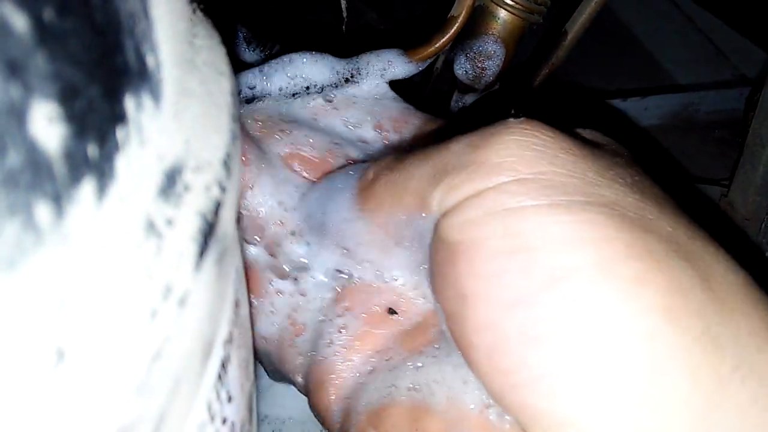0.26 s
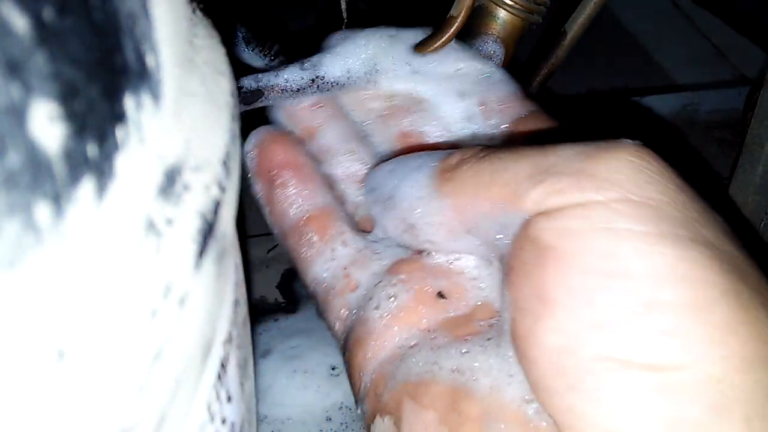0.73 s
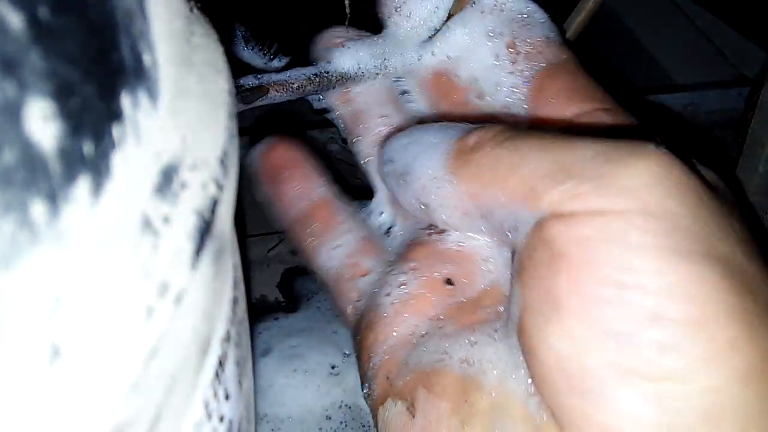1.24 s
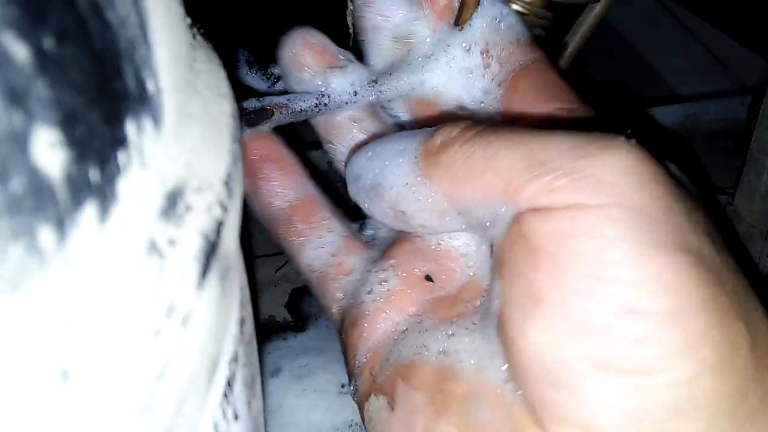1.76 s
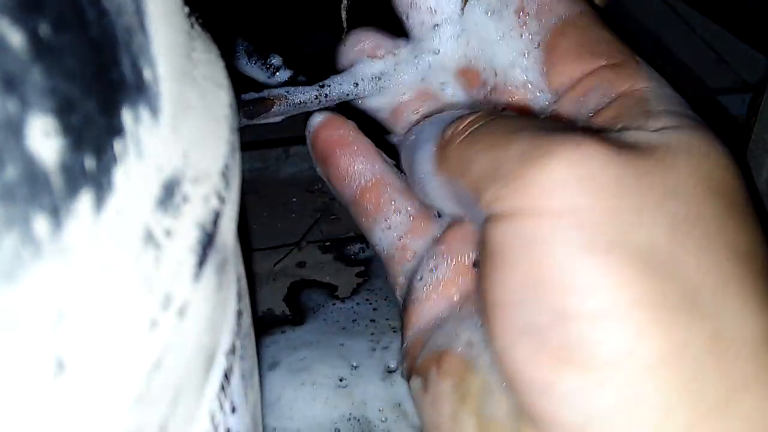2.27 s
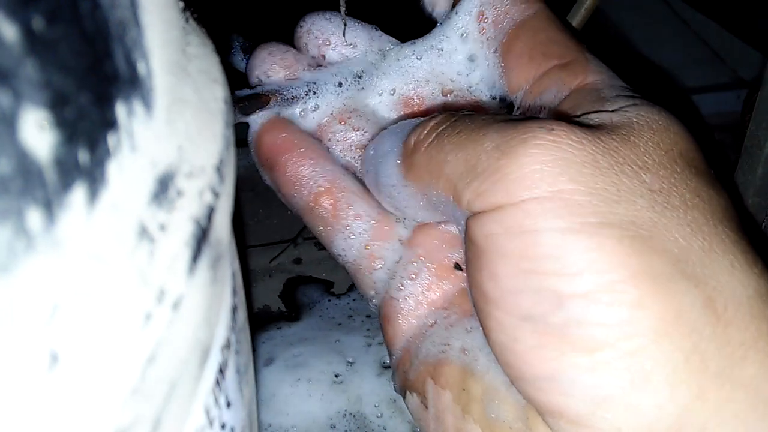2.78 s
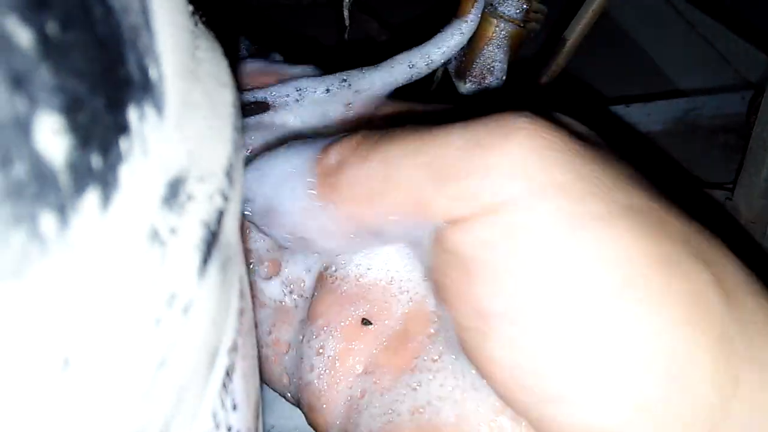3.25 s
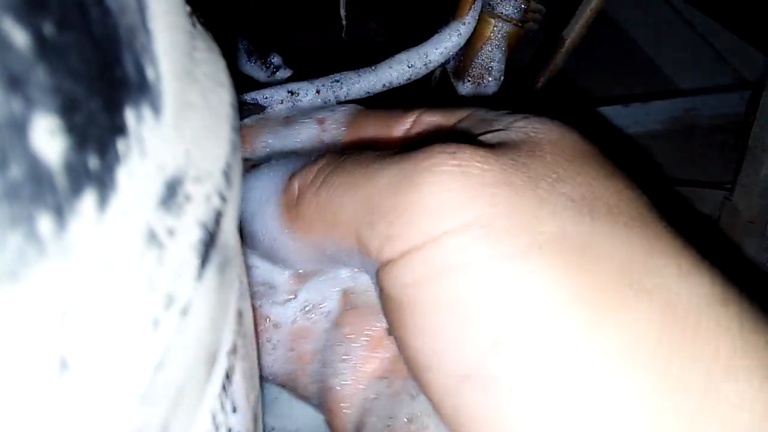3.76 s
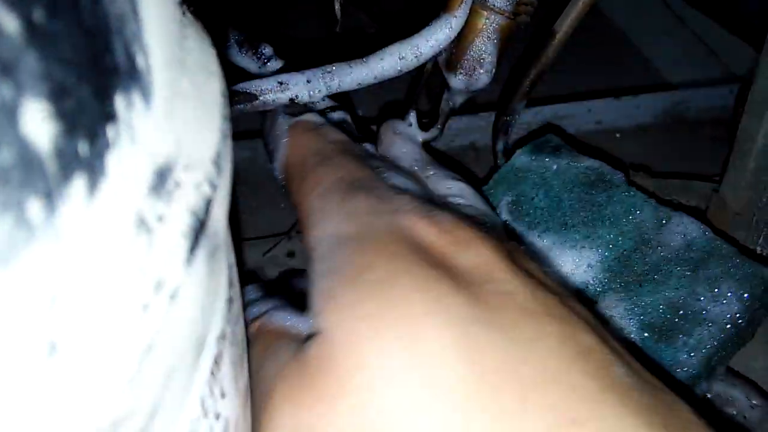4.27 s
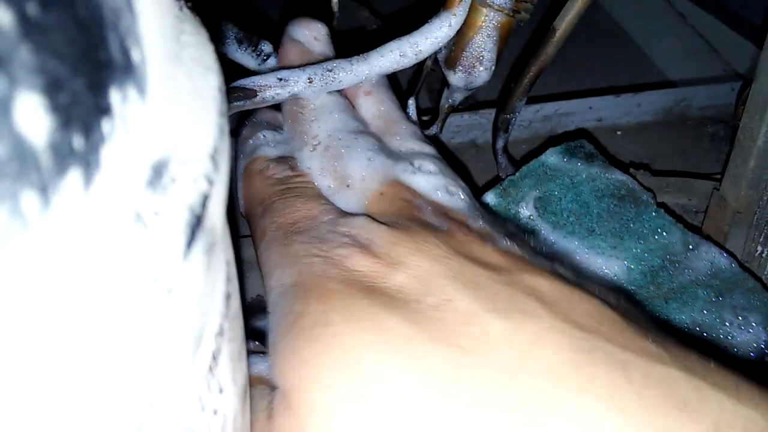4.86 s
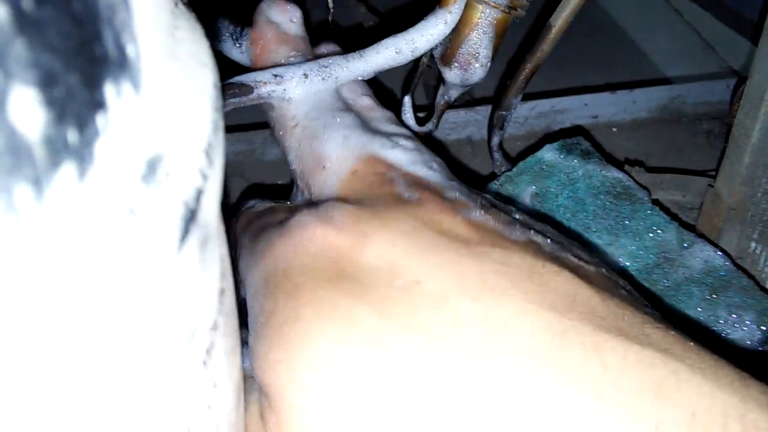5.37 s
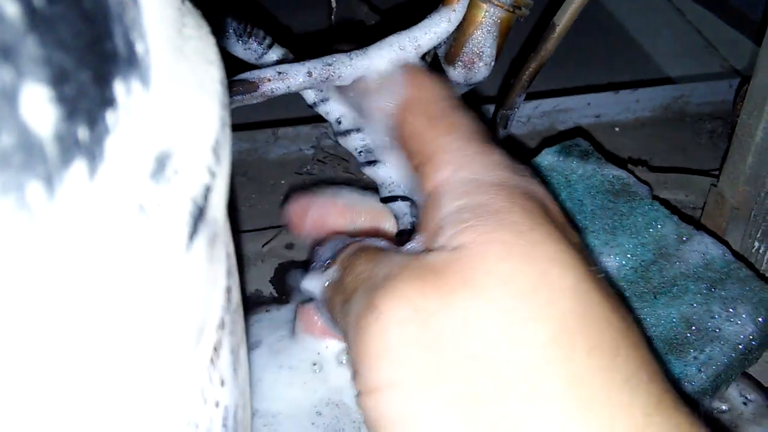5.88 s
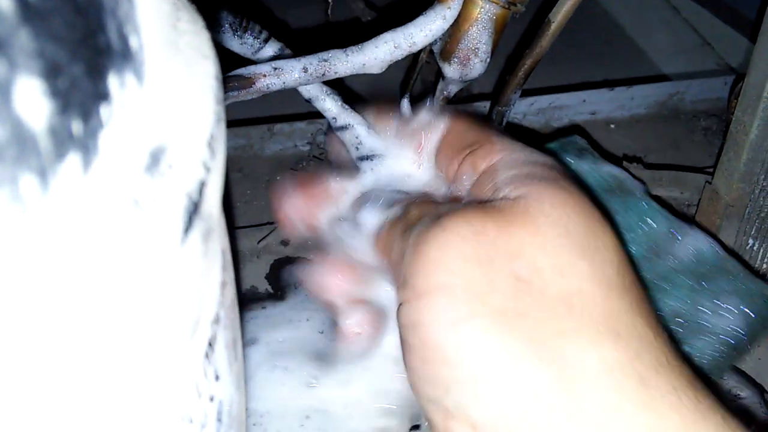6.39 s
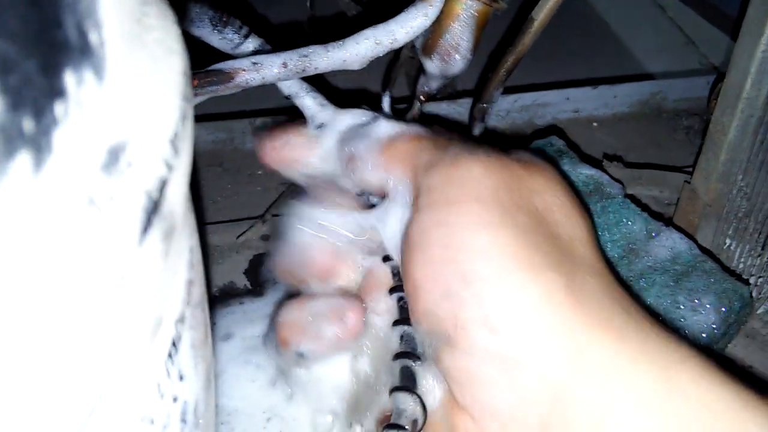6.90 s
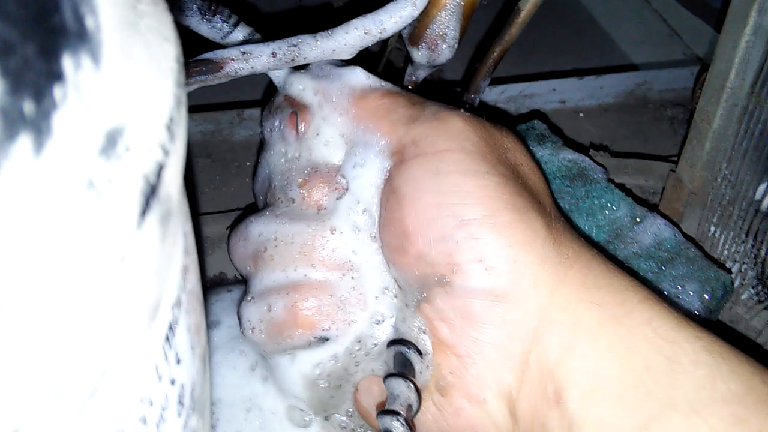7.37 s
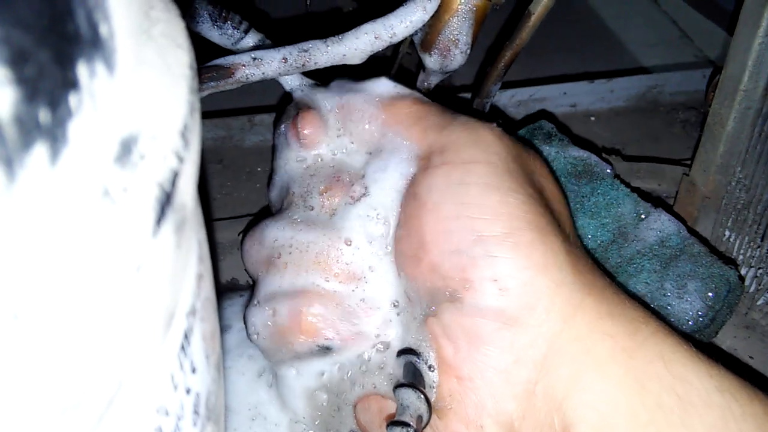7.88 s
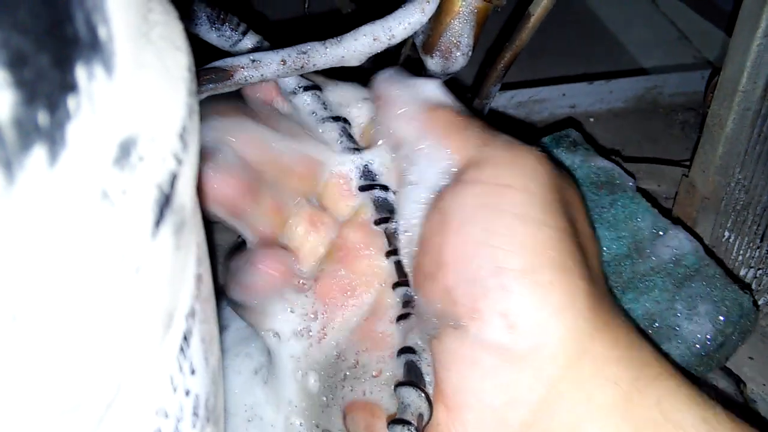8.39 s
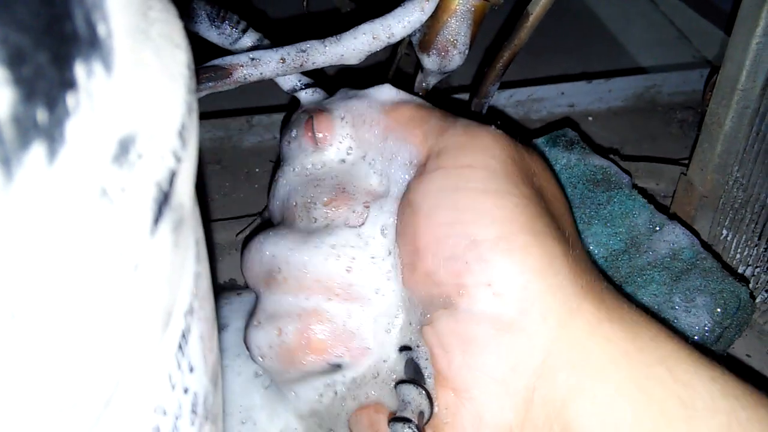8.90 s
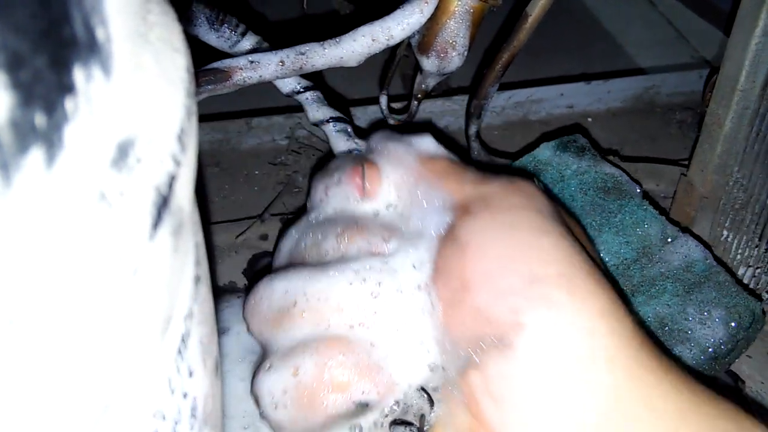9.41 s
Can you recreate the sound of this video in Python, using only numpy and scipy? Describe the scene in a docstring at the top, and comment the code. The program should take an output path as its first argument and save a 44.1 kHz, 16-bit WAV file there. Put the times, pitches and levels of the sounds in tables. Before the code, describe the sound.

Bright foamy fizz and squelching squeezes near the ear, a sharp metallic clatter early on, dull knocks, then quieter fizzing over rising rumble.

```python
"""A hand squeezes soap foam around a machine's metal tubing, close to one microphone in a workshop.
The foam fizzes with thousands of bursting bubbles, each a tiny fading ping, in finer or coarser mixes.
Tubes click and ring, the housing knocks and the frame thumps: short forces set resonances going.
Skin squeaks once; behind it lie a late drone and an uneven rumble and rush of noise, louder by the end."""
import sys
import numpy as np
from scipy import signal
from scipy.fft import rfft, irfft, next_fast_len
from scipy.io import wavfile
from scipy.ndimage import uniform_filter1d, map_coordinates

SR = 44100
rng = np.random.default_rng(int(sys.argv[2]) if len(sys.argv) > 2 else 0)


def file_out(sig):
    """Save sig as 16-bit WAV at sys.argv[1]."""
    # one column per channel
    cols = np.atleast_2d(sig).T
    # limit, then scale
    lim = np.clip(cols, -1, 1)
    pcm = np.round(lim * 32767).astype(np.int16)
    wavfile.write(sys.argv[1], SR, pcm)


N = 425565

# resonances of the nook between hand and tubing: f/Hz, width/Hz, boost/dB
NOOK_PEAKS = [(5310, 77, 3.5), (6054, 97, 3.5), (6520, 80, 2.5), (6960, 89, 4), (10300, 110, 4),
              (10860, 78, 3.5), (11170, 200, 2), (12480, 180, 0.5), (13130, 130, 2.5), (13660, 90, -2),
              (14000, 70, 6), (14370, 110, 5), (15500, 120, 3)]


def amp(db):
    """Turn decibels into gain."""
    return 10 ** (np.asarray(db) / 20)


def unit(x):
    """Scale x to an average strength (rms) of 1."""
    return x / np.sqrt(np.mean(x ** 2) + 1e-20)


def along(points, hz):
    """Read a curve of (frequency, value) points at hz, on a log frequency axis."""
    f, value = np.transpose(points)
    return np.interp(np.log(hz + 1), np.log(f + 1), value)


def curves(rows):
    """Join the rows with straight lines: one value per sample for each column after the time."""
    s, *columns = np.transpose(rows)
    return [np.interp(np.arange(N) / SR, s, column) for column in columns]


def wobble(rate):
    """A smooth random curve through `rate` random points a second."""
    knots = rng.standard_normal(int(N * rate / SR) + 4)
    return map_coordinates(knots, [np.arange(N) * rate / SR])


def filtered(x, response):
    """Filter x: multiply its spectrum by a response that depends on frequency."""
    m = next_fast_len(N + SR // 2)  # spare room for ringing
    hz = np.fft.rfftfreq(m, 1 / SR)
    return irfft(rfft(x, m) * response(hz), m)[:N]


def coloured(x, spectrum, peaks=()):
    """Shape x by a spectrum with resonance peaks (f/Hz, width/Hz, boost/dB) on it, at rms 1."""
    def gain(hz):
        boost_db = sum(db / (1 + (2 * (hz - centre) / width) ** 2) for centre, width, db in peaks)
        return amp(along(spectrum, hz) + boost_db)
    return unit(filtered(x, gain))


def resonate(x, modes):
    """Ring x through resonances (f/Hz, width/Hz, level/dB); white noise would keep its power."""
    def response(f):
        total = 0
        for k, (centre, width, db) in enumerate(modes):
            damping = 1j * f * width
            # neighbouring resonances take opposite signs
            total = total + (-1) ** k * amp(db) * damping / (centre * centre - f * f + damping)
        return total / np.sqrt(np.mean(abs(total) ** 2))
    return filtered(x, response)


def add(track, s, sound):
    """Mix a sound into the track at time s."""
    part = track[max(round(s * SR), 0):][:len(sound)]
    part += sound[:len(part)]


def echo(x, wet_db):
    """Add the dense answer of nearby panels and walls: noise that dies at its own pace at each pitch."""
    # how long the panels and walls answer: f/Hz, time to fall by 60 dB/s
    wall_decay = [(200, 0.22), (2000, 0.24), (7000, 0.17), (14000, 0.13)]
    hz, t, z = signal.stft(rng.standard_normal(SR // 2), SR, nperseg=256)
    fade = amp(-60 * t / along(wall_decay, hz)[:, None])
    tail = signal.istft(z * fade, SR, nperseg=256)[1]
    answer = signal.fftconvolve(x, tail / np.linalg.norm(tail))[:N]
    return (x + amp(wet_db) * answer) / np.hypot(1, amp(wet_db))  # about the same power as x


def stroke(start, rise, length, fade_db_per_s):
    """Gain of one stroke: it rises, fades slowly while held and dies faster once released."""
    release_db_per_s = 38.5
    t = np.maximum(np.arange(N) / SR - start, 0)
    released = np.maximum(t - length, 0)
    return np.minimum(t / max(rise, 1 / SR), 1) * amp(-fade_db_per_s * t - release_db_per_s * released)


def chatter(t60, attack=0.00053):
    """The rough, dying force of one contact: noise that falls by 60 dB in t60 seconds."""
    t = np.arange(SR // 2) / SR
    return rng.standard_normal(len(t)) * amp(-60 * t / t60) * (1 - np.exp(-t / attack))


def background():
    """A low, uneven rumble of noise fills the workshop; a soft rush follows part of its swings."""
    # level of the rumble: t/s, level/dB
    rumble_level = [(0, -63), (.7, -68.5), (3.2, -62.5), (4.6, -59.5), (5.2, -63), (6.7, -49.5),
                    (7.4, -54.5), (8.1, -49), (9.2, -48), (9.65, -44.5)]
    # colour of the rumble: f/Hz, relative level per Hz/dB
    rumble_tone = [(20, -44.5), (35, -10), (50, -5), (72, 1.5), (110, 1.5), (165, -3), (215, -13.5),
                   (310, -42), (530, -89)]
    # colour of the rush: f/Hz, relative level per Hz/dB
    rush_tone = [(150, -20), (230, -2), (300, -3), (400, 1), (480, -11), (850, -12.5), (1300, -16.5),
                 (2500, -25), (5000, -28.5), (16000, -29)]
    # the room's own resonances: f/Hz, width/Hz, boost/dB
    room_peaks = [(328.3, 9, 8), (388, 21, -1), (539, 18, 11), (603, 24, 5), (733, 14, 7.5), (840, 28, 5.5),
                  (958, 45, 4)]
    rumble_db, = curves(rumble_level)
    rush_db = -61 + 0.33 * (rumble_db - rumble_db.mean())  # mean level, share of the swings
    lumps_db = 2.1 * wobble(9)
    rumble = amp(rumble_db + lumps_db) * coloured(rng.standard_normal(N), rumble_tone)
    rush_gain = amp(rush_db + 0.51 * wobble(3.7))
    rush = rush_gain * coloured(rng.standard_normal(N), rush_tone, room_peaks)
    return rumble + rush


def drone():
    """A narrow, wavering band of low sound wells up and slowly fades: a tone with random swings."""
    start_s, rise_s, pitch_hz, level_db, fade_db_per_s = 8.02, 0.075, 285, -54.5, 8
    phase = 2 * np.pi * pitch_hz * np.arange(N) / SR
    band = unit(wobble(55) * np.sin(phase) + wobble(55) * np.cos(phase))
    swell = stroke(start_s, rise_s, N / SR, fade_db_per_s)
    return amp(level_db) * swell * band


def squeaks():
    """Wet skin slips on a tube: a short swell of friction noise in a few resonances."""
    # slips of a finger: t/s, length/s, level/dB
    slips = [(7.078, 0.2, -56.5)]
    # resonances of the squeak: f/Hz, width/Hz, level/dB
    skin_modes = [(960, 79, -0.5), (1344, 61, -4), (1620, 59, -11), (2330, 52, 2), (3220, 48, -1)]
    rub = np.zeros(N)
    for s, length, db in slips:
        swell = np.hanning(int(length * SR)) ** 0.71
        add(rub, s, amp(db) * swell * rng.standard_normal(len(swell)))
    return resonate(rub, skin_modes)


def thumps():
    """Every push rocks the same low modes of the frame: fading tones at slightly new strengths."""
    # soft thumps of the whole machine: t/s, relative level/dB
    pushes = [(.005, -52), (0.76, -45.5), (1.727, -33.5), (1.85, -45), (2.563, -36), (2.609, -30.5),
              (2.64, -28.5), (2.68, -37), (5.249, -46), (5.321, -47.5), (5.604, -43.5), (6.485, -49),
              (6.68, -44.5), (7.327, -47.5)]
    # modes of the frame: f/Hz, relative level/dB, time to fall by 60 dB/s
    frame_modes = [(73.6, -14.5, 1), (95.9, 3.5, 0.46), (111.2, -1, 0.26), (123, 0, 0.62), (143, -9, 0.63)]
    t, out = np.arange(SR) / SR, np.zeros(N)
    for s, thump_db in pushes:
        ring = np.zeros(SR)
        for hz, db, t60 in frame_modes:
            chance = rng.normal(0, 1.5)  # shifts both the level (dB) and the phase (radians)
            ring += amp(db + chance - 60 * t / t60) * np.sin(2 * np.pi * hz * t + chance)
        add(out, s, amp(thump_db - 3.5) * ring * (1 - np.exp(-t / 0.002)))  # soft onset
    return out


def knocks():
    """The housing answers each contact of a rattle with a clunk, the air inside with a hollow boom."""
    # knocks, some rattling on: t/s, length of rattle/s, relative ring level/dB, relative boom level/dB
    knock_times = [(.009, .06, -79.5, -47), (1.727, .02, -23.5, -44.5), (2.571, .02, -47, -61),
                   (2.611, .1, -47, -51), (5.519, .02, -66, -53.5), (6.129, .02, -58, -71),
                   (6.491, .18, -54.5, -61), (7.138, .02, -62, -53), (7.505, .02, -50.5, -51),
                   (9.301, .02, -52, -67), (9.334, .06, -48.5, -50), (9.423, .02, -57, -43.5)]
    # resonances of the housing: f/Hz, width/Hz, level/dB
    housing_modes = [(540.5, 17, -13.5), (731.4, 7, 5.5), (744, 59, 0.5), (795, 57, -8), (808, 13, -1),
                     (828, 47, -5)]
    # resonances of the air inside: f/Hz, width/Hz, level/dB
    air_modes = [(165, 27, -2.5), (378, 9.3, 2.5), (436, 17, -9)]
    contact_gap_s, loss_db_per_s = .039, 20  # time between contacts, and how the rattle weakens
    panel, air = np.zeros((2, N))
    for s, length, ring_db, boom_db in knock_times:
        long_db = -15.5 + 0.22 * ring_db  # a stronger knock has more long chatter
        for delay in np.arange(0, length, contact_gap_s):
            force = amp(-7.0) * chatter(t60=0.035) + amp(long_db) * chatter(t60=0.43)
            force[0] += amp(16.5)  # the blow itself, ahead of its chatter
            force *= amp(-loss_db_per_s * delay)
            add(panel, s + delay, amp(ring_db + 10.0) * force)
            add(air, s + delay, amp(boom_db + 12.0) * force)
    return resonate(panel, housing_modes) + resonate(air, air_modes)


def clicks():
    """Tubes click and grate: each contact excites low and high resonances and a bright edge."""
    # contacts, relative levels: t/s, high modes/dB, low modes/dB, bright edge/dB
    contacts = [(.765, -57, -60, -52), (1.701, -23.5, -23, -20), (1.7135, -19.5, -24, -20),
                (1.72, -28, -22.5, -18), (1.732, -40, -45, -23.5), (2.011, -57, -61, -48),
                (2.1924, -40, -49, -40), (2.292, -60, -67, -42), (2.564, -36, -51, -25.5),
                (2.575, -34, -45, -25.5), (2.612, -32.5, -51, -25), (2.623, -36, -49, -31),
                (2.68, -38, -45, -30.5), (2.707, -41, -48, -33.5), (2.784, -49, -64, -39),
                (5.276, -49, -50, -40), (5.336, -55, -55, -46), (5.516, -51, -56, -45),
                (6.411, -50, -51, -37.5), (6.437, -51, -62, -41), (6.486, -48, -52, -46),
                (6.567, -48, -57, -39), (6.589, -53, -58, -51), (6.627, -55, -53, -48),
                (6.669, -54.5, -67, -50), (9.311, -58, -66, -57), (9.379, -54, -71, -50)]
    # resonances of the tube, low to high: f/Hz, width/Hz, level/dB
    tube_modes = [(1353, 41, -2), (1706, 28, 0), (1790, 17, -3), (1970, 105, -0.5), (2340, 51, 0),
                  (2470, 38, 0), (2620, 45, -1.5), (2800, 120, -7), (3090, 53, 0), (3334, 37, 4.5),
                  (3690, 140, 0.5), (3940, 43, 2), (4108, 32, 8), (4196, 66, 2.5), (4390, 40, 1),
                  (4950, 140, -0.5), (5500, 69, -2)]
    # colour of the bright edge: f/Hz, relative level per Hz/dB
    edge_tone = [(1200, -22), (1700, -15), (4000, -2), (4700, -10.5), (6000, -1.5), (8500, -4.5),
                 (10300, 5.5), (12000, -4.5), (13700, 5.5), (16000, -7.5)]
    modes_t60, edge_t60 = .13, 0.17  # seconds for the chatter to fall by 60 dB
    low, high, edge = np.zeros((3, N))
    for s, high_db, low_db, edge_db in contacts:
        # each force starts a little early, as it needs time to build up
        add(low, s - .003, amp(low_db - 4.5) * chatter(modes_t60, attack=0.0024))
        add(high, s - .003, amp(high_db + 0.5) * chatter(modes_t60, attack=0.0034))
        add(edge, s - .002, amp(edge_db) * chatter(edge_t60))
    grit = unit(amp(2.0 * wobble(700)))  # fast, rough changes in strength
    low_modes, high_modes = np.split(np.array(tube_modes), [5])
    ring = resonate(low * grit, low_modes) + resonate(high * grit, high_modes)
    snap = filtered(edge * grit, lambda f: unit(amp(along(edge_tone, f))))
    return echo(ring + snap, wet_db=-6.5)


def bursts(low_hz, high_hz, rate, cycles, spread_db, size=64):
    """Bubbles burst at random, `rate` a second: each a ping that dies over a few cycles."""
    when, pitch, strength = rng.random((int(rate * N / SR), 3)).T
    start = (when * N).astype(int)
    low, high = (np.broadcast_to(hz, N)[start] for hz in (low_hz, high_hz))
    turns = (low + (high - low) * pitch)[:, None] * np.arange(size) / SR  # cycles so far
    scatter = np.minimum(-np.log(1 - strength), 4)  # mostly small, now and then large
    pings = amp(spread_db * scatter)[:, None] * np.sin(2 * np.pi * turns) * np.exp(-turns / cycles)
    places = start[:, None] + np.arange(size)
    return np.bincount(places.ravel(), pings.ravel(), N + size)[:N]


def squelches():
    """In the wettest foam the bubbles crowd around one size, whose pitch shifts with the grip."""
    # squelches: middle t/s, length/s, pitch f/Hz, level/dB
    wet_squeezes = [(.68, 0.62, 5850, -50), (1.28, 0.33, 5800, -60), (2.05, .3, 5320, -56),
                    (2.78, 0.11, 6200, -42), (3.2, 0.88, 5920, -53), (3.9, 0.81, 5240, -51.5),
                    (4.43, 0.57, 4570, -45.5), (5.62, 0.54, 5650, -46), (6.152, 0.8, 5800, -54.5),
                    (6.948, 0.98, 5300, -57.5)]
    swells = np.zeros(N)
    for middle, length, _, db in wet_squeezes:
        add(swells, middle - length / 2, amp(db) * np.hanning(int(length * SR)) ** 0.69)
    _, pitch_hz, _ = curves(wet_squeezes)
    pops = bursts(pitch_hz - 380, pitch_hz + 380, rate=1300, cycles=12.0, spread_db=4.0, size=160)
    tone = [(2000, -23.5), (4200, -6), (7000, 5.0), (11000, -12)]  # f/Hz, relative level per Hz/dB
    return swells * coloured(pops, tone, NOOK_PEAKS)


def drift(x):
    """As the hand changes shape, narrow bands of the sound swell and sink: a smoothed random gain."""
    depth_db, width_hz, life_s = 2.2, 260, .3
    hop = 256  # samples between analysis frames
    z = signal.stft(x, nperseg=2 * hop)[2]
    bins, frames = max(round(width_hz * 2 * hop / SR), 1), max(round(life_s * SR / hop), 1)
    field = uniform_filter1d(rng.standard_normal(z.shape), bins, 0)
    field = uniform_filter1d(field, frames, 1)
    gain = unit(amp(depth_db * unit(field)))
    return signal.istft(z * gain, nperseg=2 * hop)[1][:N]


def foam():
    """Each squeeze bursts four sizes of bubble in shared flurries; at rest the foam fizzes on faintly."""
    # squeezes: start t/s, rise/s, length/s, relative level/dB, extra finest/dB, extra coarse wet bubbles/dB
    squeezes = [(-.06, 0.057, 0.17, -40, 6, -0.5), (0.142, .004, .08, -35.5, 4, -0.5),
                (0.31, .12, 0.44, -38, 2.5, -1.5), (.64, 0.051, 0.12, -36.5, 2, -2),
                (0.863, .11, 0.23, -41.5, 2, -3), (1.1, 0.058, 0.25, -37, 2, -3),
                (1.67, .03, 0.39, -36, 2.5, 3), (2.11, 0.095, 0.16, -36.5, -1, 0),
                (2.34, 0.088, .35, -42, 4, -5), (2.735, .006, 0.017, -34.5, -11, 5.5),
                (2.938, 0.18, 0.53, -40, -8, -1), (3.415, .1, 0.28, -37, -2, -2.5),
                (3.67, 0.061, 0.61, -36.5, 0, 2.5), (4.27, 0.08, 0.24, -38.5, 3.5, 7),
                (4.522, 0.095, 0.13, -39.5, 8.5, 7.5), (4.99, 0.23, 0.24, -39, .5, 2),
                (5.351, 0.12, 0.42, -39, 0, 1.5), (5.875, 0.041, 0.4, -42.5, 3.5, 0),
                (6.393, 0.033, 0.34, -42.5, -0.5, 4), (6.774, .14, 0.25, -41, -0.5, 0.5),
                (7.142, .1, 0.19, -50, 10.5, 8), (7.613, 0.34, 0.13, -50, 10.5, 0),
                (7.97, .03, 0.051, -48.5, -4, 1), (8.213, 0.026, 0.17, -47, 0, -4),
                (8.634, 0.036, 0.37, -47.5, 1.5, -20), (8.924, 0.11, 0.35, -44, -2, -12),
                (9.227, 0.18, 0.33, -42.5, -1, 0)]
    # bubbles, finest first: lowest f/Hz, highest f/Hz, bursts per s, share of a squeeze/dB, rest level/dB
    bubble_sizes = [(12700, 15100, 4000, 3, -48), (9370, 12750, 3800, -1.5, -69),
                    (5920, 9050, 3200, -3.5, -60.5), (2450, 6200, 2600, -16.5, -67)]
    # colour of the fizz: f/Hz, relative level per Hz/dB
    fizz_tone = [(1200, -36), (2000, -33.5), (2900, -35), (3150, -29), (3800, -31.5), (4500, -23),
                 (5800, -22), (6020, -14), (7400, -11), (8800, -13.5), (10200, -6.5), (12200, -4.5),
                 (13700, -3), (14900, -8), (15700, -1)]
    sag_db_per_s = 0.5  # the fizz tires under the grip
    pressing = np.array([stroke(s, rise, length, sag_db_per_s) for s, rise, length, *_ in squeezes])
    mixes = np.array([amp([db + fine_db, db, db, db + wet_db]) for *_, db, fine_db, wet_db in squeezes])
    powers = mixes.T ** 2 @ pressing ** 2  # one power curve for each bubble size
    fizz = squelches()
    for power, (low_hz, high_hz, rate, share_db, rest_db) in zip(powers, bubble_sizes):
        pops = bursts(low_hz, high_hz, rate, cycles=3.5, spread_db=-0.5)
        gain = np.hypot(amp(share_db) * np.sqrt(power), amp(rest_db))
        fizz += gain * amp(1.0 * wobble(14)) * coloured(pops, fizz_tone, NOOK_PEAKS)
    flurry_db = 0.7 * wobble(25) + 0.21 * wobble(130)
    return echo(drift(fizz) * amp(flurry_db), wet_db=-4.0)


def scene():
    """All sources add up at one microphone, which feeds both channels alike."""
    mono = background() + drone() + squeaks() + thumps() + knocks() + clicks() + foam()
    return np.array([mono, mono])


def record(dry):
    """The recorder keeps nothing at or above its band limit."""
    top_hz = 15780
    return np.array([filtered(x, lambda hz: hz < top_hz) for x in dry])


dry = scene()
out = record(dry)
file_out(out)
```